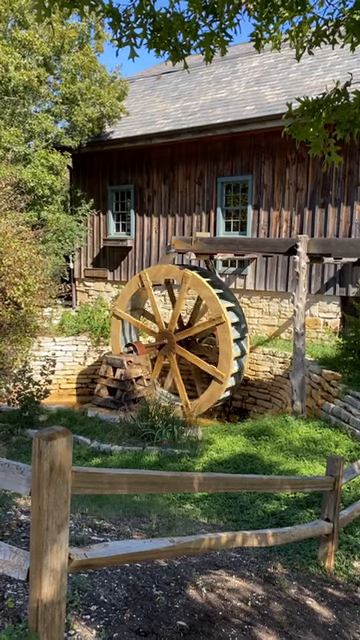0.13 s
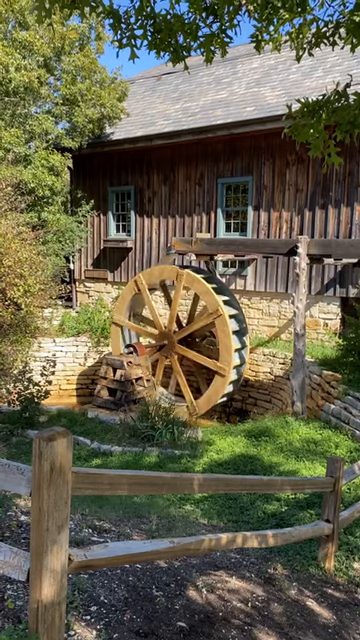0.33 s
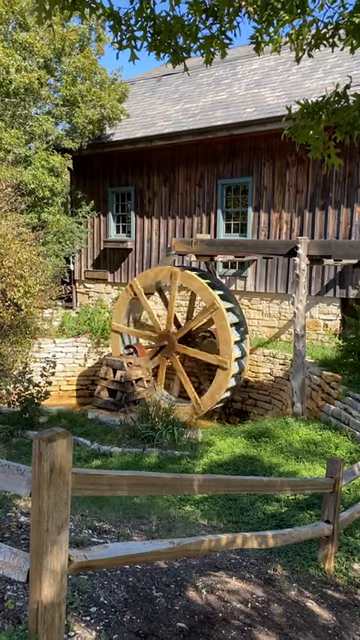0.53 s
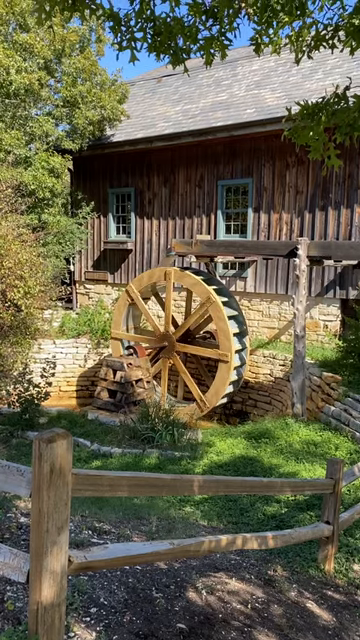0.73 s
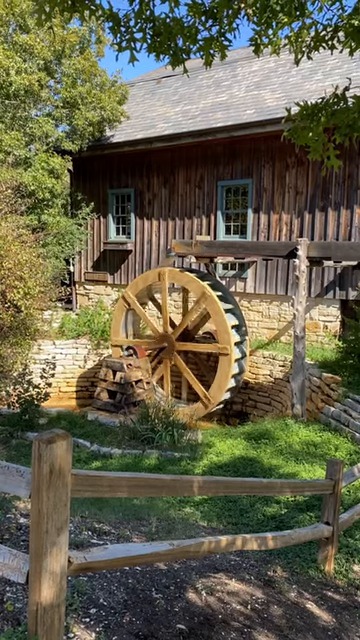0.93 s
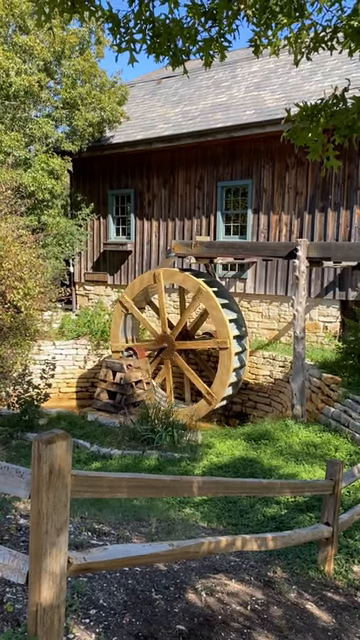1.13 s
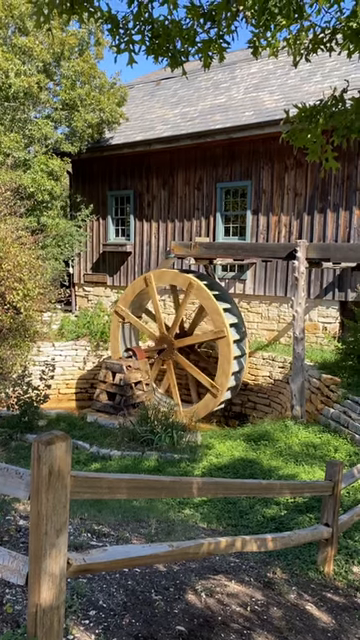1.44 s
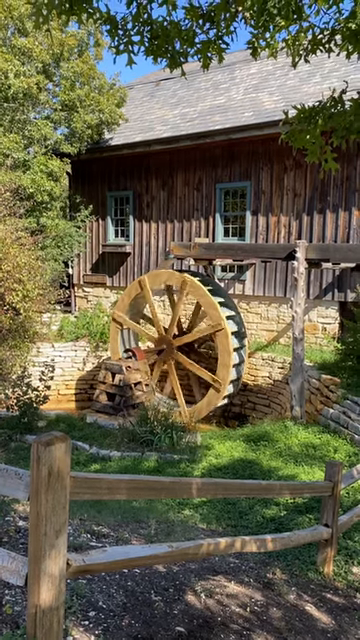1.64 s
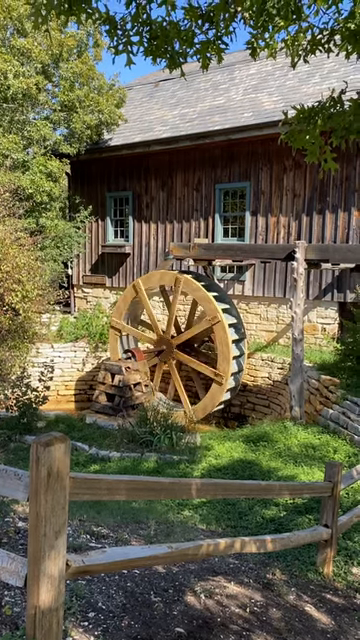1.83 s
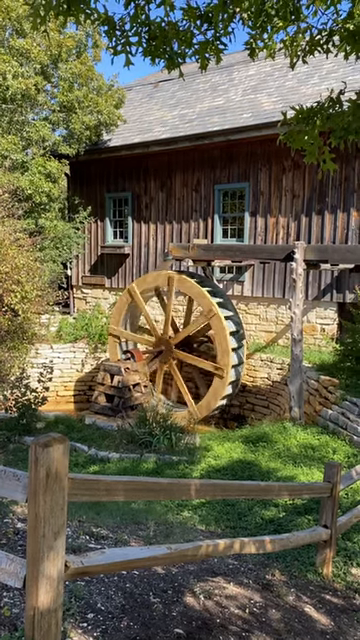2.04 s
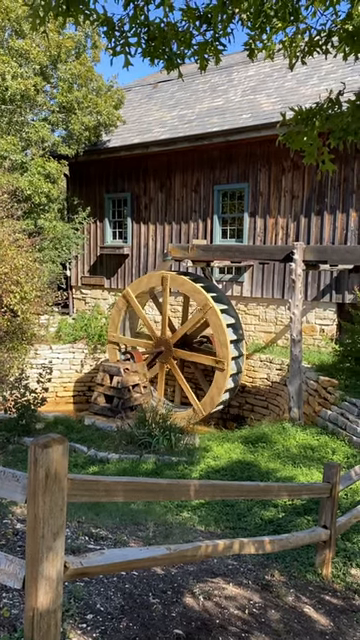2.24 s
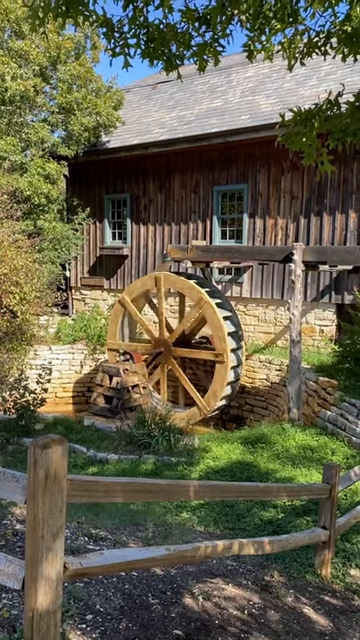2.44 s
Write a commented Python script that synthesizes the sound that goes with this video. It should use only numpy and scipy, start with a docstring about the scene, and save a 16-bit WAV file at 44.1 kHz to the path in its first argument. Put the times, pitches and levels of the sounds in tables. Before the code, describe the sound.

Water pours steadily over a turning wooden mill wheel, with a bubbly splash every 0.4 seconds

```python
"""A wooden mill wheel a few metres off: after a silent 36 ms the take opens on a steady pour and the first bucket.
About every .4 s another bucket tips: a bright splash of bubbly noise, then a lower gurgle.
In between slops froth around a pitch, big bubbles plop as rising sines, drops plink and fizz fills the treble;
noise sprays join from .73 s and recur to the end. Throughout, the gear rumbles and drones under the water beside
a low uneven hum, the mill wall answers with short noise tails, and two close microphone ports listen."""
import sys
import numpy as np
from scipy import signal
from scipy.fft import rfft, irfft, next_fast_len
from scipy.io import wavfile
from scipy.ndimage import uniform_filter1d, map_coordinates

SR = 44100
rng = np.random.default_rng(int(sys.argv[2]) if len(sys.argv) > 2 else 0)


def put_to_file(sound):
    """Save the sound as 16-bit audio at rate SR, in the file named by the first command-line argument."""
    columns = np.atleast_2d(sound).T  # one column per channel
    safe = np.clip(columns, -1, 1)
    whole_steps = np.round(safe * 32767)
    wavfile.write(sys.argv[1], SR, whole_steps.astype(np.int16))


N = 113778

# Spectra are relative gains on flat noise or bubbles; the level is set separately.
# buckets tipping out: t/s, splash level/dB, gurgle level/dB, splash rise t/s, splash hold t/s, gurgle roll-off f/Hz
BUCKETS = [(0.001, -43.5, -46, 0.015, 0.035, 3000), (0.397, -45.5, -51, 0.024, 0.023, 3000),
           (0.787, -46, -49, 0.025, 0.035, 3000), (1.21, -44, -50.5, 0.0071, 0.019, 2500),
           (1.601, -45.5, -47, 0.0019, 0.03, 2402), (1.973, -45.5, -48, 0.014, 0.04, 2595),
           (2.364, -46, -52.5, 0.013, 0.044, 2614)]
# splash of a bucket: f/Hz, gain/dB
SPLASH_SPECTRUM = [(150, -20), (350, 8), (700, -8.5), (1300, 2.5), (2200, 3.5), (2900, 1.5), (3600, -3.5),
                   (5400, -6.5), (8000, -5.5), (11000, -16), (15500, -29)]
# gurgle of a bucket before its roll-off: f/Hz, gain/dB
GURGLE_SPECTRUM = [(120, -3), (300, 20.5), (550, 8.5), (800, 8), (1400, 12), (2200, 5.5), (3500, -13),
                   (7000, -72), (15000, -78)]
SPLASH_DECAY_S = 0.035
GURGLE_DELAY_S, GURGLE_ATTACK_S, GURGLE_HOLD_S, GURGLE_DECAY_S = 0.0087, 0.044, 0.095, 0.083

# steady pour: f/Hz, gain/dB
POUR_SPECTRUM = [(100, -24), (350, 1), (560, -5), (750, 2.5), (930, 3), (1100, -1.5), (1350, -0.5),
                 (1800, -5), (2200, -3.5), (2700, -5), (3500, -12), (5200, -11), (7500, -25.5),
                 (11000, -19.5), (15500, -36)]
# strength of the pour, used about its own mean: t/s, relative level/dB
POUR_FLOW = [(0, -2.5), (.3, 0), (.6, -0.2), (.95, -0.9), (1.1, -2), (1.35, -1), (1.52, -2.5),
             (1.595, -1.5), (1.66, -1), (1.8, -0.2), (2.1, -0.5), (2.24, -2), (2.35, -2), (2.45, -2),
             (2.58, -1.5)]
POUR_DB = -47.5
PATCH_DB = 1.43  # rms depth of the clumps in running water

# stray slops of water: centre t/s, level/dB, pitch f/Hz, Gaussian width t/s
SLOPS = [(0.057, -46, 393, 0.023), (0.085, -47.5, 850, 0.013), (0.161, -47.5, 1030, 0.019),
         (0.18, -44, 302, 0.011), (0.404, -50, 304, 0.014), (0.526, -47, 1100, 0.0074),
         (0.98, -49, 870, 0.019), (1.237, -42.5, 372, 0.012), (1.332, -44.5, 850, 0.023),
         (1.69, -50.5, 796, 0.023), (1.766, -54, 900, 0.0065), (2.153, -51, 900, .008),
         (2.159, -42, 259.7, 0.0094), (2.54, -50, 1196, 0.023)]
SLOP_WIDTH = 0.52  # bandwidth over pitch

# big single bubbles: t/s, level before rise and decay/dB, starting pitch f/Hz, decay to 1/e t/s
PLOPS = [(.037, -33, 936, 0.0061), (0.037, -39.5, 1510, .007), (.44, -42, 1650, .007),
         (0.526, -48, 1274, .006), (.835, -49, 2680, .009), (0.835, -43, 2950, .008),
         (0.948, -40, 1780, 0.0061), (1.236, -39, 1636, 0.0077), (1.308, -37, 920, 0.0057),
         (1.327, -38, 898, 0.0069), (1.604, -34, 1282, 0.0059), (1.63, -39, 1367, .006),
         (1.758, -44, 911, 0.008), (1.995, -41, 1640, .007), (2.019, -49, 1665, 0.0081),
         (2.388, -35.5, 1391, 0.0043), (2.403, -43, 2468, 0.0096), (2.429, -37, 1357, .007),
         (2.525, -38, 1225, 0.0075), (2.538, -35, 1310, 0.0071), (2.545, -36, 972, 0.012)]
PLOP_RISE_PER_S = 0.76  # relative climb of a bubble's pitch

# spray thrown off the rim: centre t/s, level/dB
SPRAYS = [(.73, -65), (1.15, -53), (2.15, -49), (2.545, -47.5)]
SPRAY_WIDTH_S = 0.015  # Gaussian width

# single drops: f/Hz, gain/dB
PLINK_SPECTRUM = [(400, -25), (900, -6.5), (2500, -6.5), (3500, -10.5), (6000, -20), (12000, -24)]
PLINK_DB = -65

# fine treble fizz through the take: t/s, level/dB
FIZZ_LEVEL = [(.05, -54.5), (.23, -54.5), (.37, -54.5), (.52, -60.5), (.62, -54), (.93, -56.5),
              (1.07, -55.5), (1.301, -54), (1.46, -56), (1.6, -55), (1.8, -55.5), (1.96, -53.5),
              (2.12, -60), (2.27, -57.5), (2.38, -57), (2.58, -61)]
# fizz: f/Hz, gain/dB
FIZZ_SPECTRUM = [(1000, -21), (2500, 7.5), (3600, 10), (5200, 8), (8000, 11), (11000, 1.5), (14000, -0.5),
                 (15500, -2)]

# rumble of the gear: f/Hz, gain/dB
RUMBLE_SPECTRUM = [(20, -27), (38, -14.5), (54, 1), (80, -2), (95, -1.5), (120, -0.5), (150, -5),
                   (250, -7.5), (320, -10.5), (380, -8), (480, -15), (700, -19.5), (2000, -68)]
# level of the deepest rumble, used about its own mean: t/s, relative level/dB
DEEP_LEVEL = [(.08, -48), (.32, -40.5), (.45, -48.5), (.56, -44), (.66, -54), (.76, -42.5), (.87, -47.5),
              (1.17, -38.5), (1.22, -50), (1.28, -42), (1.37, -48.5), (1.44, -45), (1.8, -47.5),
              (1.88, -45), (1.95, -50.5), (2.18, -47), (2.24, -44), (2.3, -44), (2.36, -42.5), (2.5, -43.5)]
# low hum, uneven in pitch and level: t/s, pitch f/Hz, relative level/dB
HUM = [(0.05, 113.6, -47.5), (0.24, 115.5, -45.5), (0.28, 109.6, -46.5), (0.32, 105.7, -56),
       (0.4, 109.9, -39), (0.43, 117.2, -47.5), (0.73, 113.2, -46.5), (0.78, 115, -53), (0.8, 117.1, -49),
       (1.13, 114, -53.5), (1.18, 114.3, -46), (1.22, 116.7, -45), (1.28, 113.2, -45), (1.43, 113, -43),
       (1.51, 110.3, -58), (1.59, 107.4, -46), (1.68, 114.1, -49.5), (1.79, 113.8, -45), (1.85, 112.2, -53),
       (1.96, 115.3, -43), (2.08, 105, -54.5), (2.26, 117.4, -46.5), (2.29, 115.8, -46), (2.34, 108.2, -50),
       (2.5, 110.5, -42.5), (2.56, 108.1, -63)]
# close pair of higher tones from the gear, before the level curve below: f/Hz, level/dB
DRONE = [(350, -57), (367, -55.5)]
# level of that pair, used about its own mean: t/s, relative level/dB
DRONE_LEVEL = [(.05, -1.5), (.42, 5), (.5, -2), (.65, 1.5), (.95, 1.5), (1.07, 1), (1.3, -7), (1.5, 1),
               (1.7, 1.5), (1.9, 0.5), (2.12, 4.5), (2.3, 2.5), (2.58, -1)]
RUMBLE_DB = -44.5  # of the whole rumble, before its deep part is taken out
DEEP_DB, HUM_DB = -49.5, -50.5

WALL_DB, WALL_T60_S = -12, 0.15

# likeness of left and right: f/Hz, correlation/0-1
ALIKE = [(60, 0.96), (130, 1), (300, 0.97), (600, 0.83), (1000, 0.9), (2000, 1), (2800, 0.32), (3500, 0),
         (4500, 0.53), (5500, 1), (8000, 1), (15000, 1)]
# left port over right port: f/Hz, level/dB
BALANCE = [(60, 0.5), (260, 1), (400, -0.5), (550, 5.5), (1000, 2.5), (1450, 4.5), (1650, 0.5),
           (2500, -0.3), (3300, 1.5), (3800, 2.5), (4700, -0.2), (8000, -0.5)]
# lead of the left port over the right: f/Hz, phase/rad
PORT_LEAD = [(0, 0), (2000, 0), (3200, 1.6), (3700, .6), (4300, 1), (5200, .4), (7200, 3.1), (8200, 3.6),
             (10000, 6.1), (11500, 6.6), (12800, 9), (14400, 9.8), (15600, 12.3)]
START_S, TOP_HZ = 0.036, 15760  # silent before, empty above


def buckets():
    """Each bucket's load smacks down, then gurgles, duller or brighter, as the rest runs out."""
    splash = water(SPLASH_SPECTRUM, cycles=9, bubble_db=1.5, count=5000, scatter_db=0.4)
    gurgle = water(GURGLE_SPECTRUM, cycles=9, bubble_db=2.5, count=3000, scatter_db=0.5)
    splash = evened(splash, size=500)
    gurgle = evened(gurgle, size=900)
    out = np.zeros((2, N))
    for start, splash_db, gurgle_db, rise, hold, top_hz in BUCKETS:
        impact = swell(start, rise, hold, SPLASH_DECAY_S)
        drain = swell(start + GURGLE_DELAY_S, GURGLE_ATTACK_S, GURGLE_HOLD_S, GURGLE_DECAY_S)
        dulled = filtered(gurgle, lambda hz: 1 / np.hypot(1, (hz / top_hz) ** 2))
        out += amp(splash_db) * impact * splash
        out += amp(gurgle_db) * drain * dulled
    return out


def pour():
    """The steady fall of water onto the wheel and into the race, its strength slowly wandering."""
    flow_db = POUR_DB + drift(POUR_FLOW) + 0.12 * wobble(8.4) + 0.4 * wobble(70)
    return amp(flow_db) * water(POUR_SPECTRUM, cycles=7.0, bubble_db=-7.5, count=6000)


def slops():
    """Lumps of water plunge in: a brief froth, made of noise, around one pitch."""
    out = np.zeros((2, N))
    for centre, db, pitch, width in SLOPS:
        cavity = lambda hz: 1 / (1 + ((hz / pitch - pitch / (hz + 1)) / SLOP_WIDTH) ** 2)
        froth = evened(stereo(rng.standard_normal((2, N)), cavity), size=700)
        out += amp(db) * bump(centre, width) * froth
    return out


def plops():
    """A pocket of trapped air rings briefly, its pitch climbing as it nears the surface."""
    out = np.zeros(N)
    for start, db, pitch, decay in PLOPS:
        age = np.maximum(clock() - start, 0)
        turns = pitch * age * (1 + PLOP_RISE_PER_S * age / 2)
        envelope = (1 - np.exp(-turns)) * np.exp(-age / decay)
        out += amp(db) * envelope * np.sin(2 * np.pi * turns)
    return out


def sprays():
    """Short showers of fine drops: the splash spectrum thinned in the bass."""
    level = sum(amp(db) * bump(centre, SPRAY_WIDTH_S) for centre, db in SPRAYS)
    thin = lambda hz: hz / (hz + 1500)
    return level * water(SPLASH_SPECTRUM, cycles=9, bubble_db=-15, count=900, tilt=thin)


def plinks():
    """Single drops fall into the pool and ring longer than the froth."""
    drops = [bubbles(cycles=260, count=330, low_hz=605, high_hz=8500, scatter_db=4.5, rise=0.012)
             for _ in range(2)]
    return amp(PLINK_DB) * stereo(np.array(drops), coloured(PLINK_SPECTRUM))


def fizz():
    """Fine droplets bursting on the wet wood: treble noise with tiny bubbles."""
    level_db = np.interp(clock(), *np.transpose(FIZZ_LEVEL))
    return amp(level_db) * water(FIZZ_SPECTRUM, cycles=6, bubble_db=-11.0, count=4000)


def gear():
    """A noise rumble whose depths surge, and a higher pair of tones that beats."""
    rumble = stereo(rng.standard_normal((2, N)), coloured(RUMBLE_SPECTRUM))
    deep = filtered(rumble, lambda hz: 1 / (1 + (hz / 100) ** 8))
    upper = amp(RUMBLE_DB) * (rumble - deep)
    surge = amp(DEEP_DB + drift(DEEP_LEVEL)) * evened(deep, size=2400)
    drone = sum(amp(db) * tone(hz, waver_hz=5.58, flutter_db=1.8) for hz, db in DRONE)
    return upper + surge + amp(drift(DRONE_LEVEL)) * drone


def hum():
    """A low hum, uneven in pitch and level: one wavering sine."""
    when, pitch_hz, level_db = np.transpose(HUM)
    low = tone(np.interp(clock(), when, pitch_hz), waver_hz=3.4, flutter_db=-0.5)
    level = amp(np.interp(clock(), when, level_db))
    return amp(HUM_DB) * unit(level * low)


def wall(x, count=20):
    """The short scattered answer of the mill wall: a fresh decaying noise tail for each slice of time."""
    t = np.arange(SR // 4) / SR
    out = np.zeros((2, N + len(t)))
    for part in np.array_split(np.arange(N), count):
        tail = rng.standard_normal(len(t)) * amp(-60 * t / WALL_T60_S)
        tail *= t > .006  # the way to the wall and back
        tail /= np.linalg.norm(tail)
        out[:, part[0]:part[-1] + len(t)] += signal.fftconvolve(x[:, part], tail[None], axes=1)
    return out[:, :N]


def water(spectrum, cycles, bubble_db, count, scatter_db=0.0, tilt=lambda hz: 1):
    """Bubbles on a bed of rushing noise, in clumps, stereo, rms 1."""
    cloud = np.array([bubbles(cycles, count, scatter_db=scatter_db) for _ in range(2)])
    bed = rng.standard_normal((2, N))
    colour = coloured(spectrum)
    return stereo(clumped(bed + amp(bubble_db) * cloud), lambda hz: colour(hz) * tilt(hz))


def bubbles(cycles, count, low_hz=350, high_hz=11000, scatter_db=0.0, rise=0.085):
    """A cloud of short ringing bubbles whose pitch rises; roughly flat spectrum, rms 1."""
    when, pitch, size = rng.random((3, count, 1))
    hz = low_hz * (high_hz / low_hz) ** pitch
    k = np.arange(SR // 80)  # samples of one ring
    turns = hz * k / SR
    age = turns / cycles
    ring = np.sin(2 * np.pi * turns * (1 + rise * np.minimum(age, 2)))
    ring *= np.exp(-np.pi * age) * (1 - (k / len(k)) ** 2)
    ring *= hz ** 0.77  # offsets the shorter ring of high bubbles
    ring *= amp(scatter_db * np.minimum(-np.log(1 - size), np.pi))  # a few stand out
    places = (when * N).astype(int) + k
    return unit(np.bincount(places.ravel(), ring.ravel(), N)[:N])


def clumped(pair):
    """Random patches of gain, some hundreds of Hz wide and some tens of ms long."""
    z = signal.stft(pair, nperseg=256)[2]
    field = uniform_filter1d(rng.standard_normal(z.shape[1:]), size=4, axis=0)
    field = uniform_filter1d(field, size=9, axis=1)
    return signal.istft(z * amp(PATCH_DB * unit(field)), nperseg=256)[1][:, :N]


def tone(hz, waver_hz, flutter_db):
    """A sine of rms 1, unsteady in pitch and level."""
    level = amp(flutter_db * wobble(12))
    turns = np.cumsum(hz + waver_hz * wobble(23.94)) / SR
    return unit(level * np.sin(2 * np.pi * turns))


def stereo(pair, gain):
    """Two unrelated signals, coloured and blended into left and right, rms 1."""
    turn = lambda hz: np.arccos(np.clip(along(ALIKE, hz), -1, 1)) / 2
    blend = lambda hz: gain(hz) * np.array([np.cos(turn(hz)), np.sin(turn(hz))])
    mid, side = filtered(pair, blend)
    return unit(np.array([mid + side, mid - side]))


def evened(pair, size):
    """Noise held near rms 1, its power averaged twice over size samples."""
    power = uniform_filter1d(np.mean(pair ** 2, axis=0), size)
    return pair / np.sqrt(np.abs(uniform_filter1d(power, size)) + 1e-12)


def filtered(x, response):
    """x times a complex response of frequency."""
    m = next_fast_len(N + SR // 2)
    return irfft(rfft(x, m) * response(np.fft.rfftfreq(m, 1 / SR)), m)[..., :N]


def coloured(spectrum):
    """The linear gain of a spectrum table as a function of frequency."""
    return lambda hz: amp(along(spectrum, hz))


def along(points, hz):
    """(f/Hz, value) points read on a log frequency axis."""
    f, v = np.transpose(points)
    return np.interp(np.log(hz + 1), np.log(f + 1), v)


def swell(start, attack, hold, decay):
    """Linear rise, hold and exponential fall, in seconds."""
    t = clock() - start
    return np.clip(t / attack, 0, 1) * np.exp(-np.maximum(t - attack - hold, 0) / decay)


def bump(centre, width):
    """A Gaussian rise and fall, in seconds."""
    return np.exp(-.5 * ((clock() - centre) / width) ** 2)


def drift(rows):
    """A level curve in dB about its own mean."""
    db = np.interp(clock(), *np.transpose(rows))
    return db - db.mean()


def wobble(rate):
    """A smooth random curve, rate knots a second."""
    return map_coordinates(rng.standard_normal(2048), [clock() * rate], mode="wrap")


def clock():
    """Time of every sample in seconds."""
    return np.arange(N) / SR


def amp(db):
    """Decibels to linear gain."""
    return 10 ** (np.asarray(db) / 20)


def unit(x):
    """x scaled to rms 1."""
    return x / np.sqrt(np.mean(x ** 2) + 1e-20)


def scene():
    """All the water and its answer from the wall, with the gear and the hum unanswered."""
    wet = pour() + fizz() + buckets() + slops() + plops() + sprays() + plinks()
    return wet + amp(WALL_DB) * wall(wet) + gear() + hum()


def record(dry):
    """The two ports differ in level and phase; the take opens late and keeps nothing above its band limit."""
    sides = np.array([[.5], [-.5]])  # half the difference to each port
    level = lambda hz: amp(sides * along(BALANCE, hz))
    phase = lambda hz: np.exp(1j * sides * np.interp(hz, *np.transpose(PORT_LEAD)))
    heard = filtered(dry, lambda hz: level(hz) * phase(hz))
    return filtered(heard * (clock() > START_S), lambda hz: hz < TOP_HZ)


dry = scene()
out = record(dry)
put_to_file(out)
```